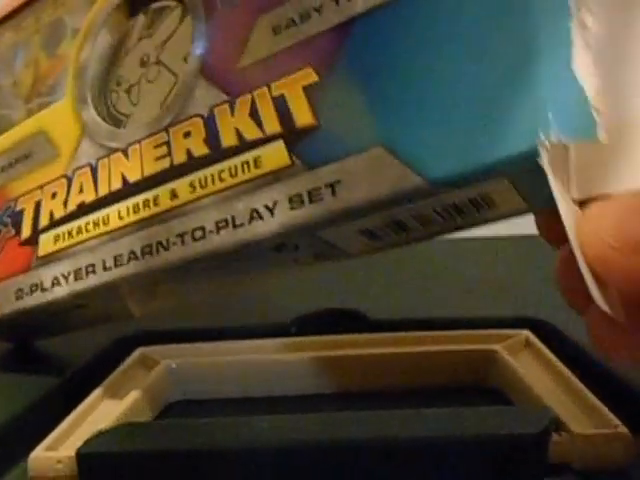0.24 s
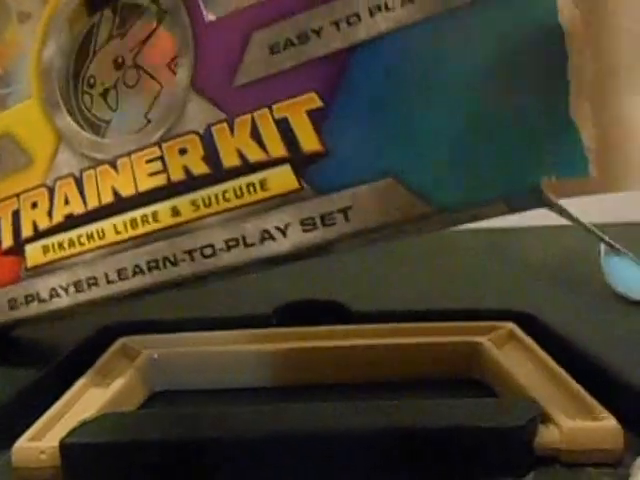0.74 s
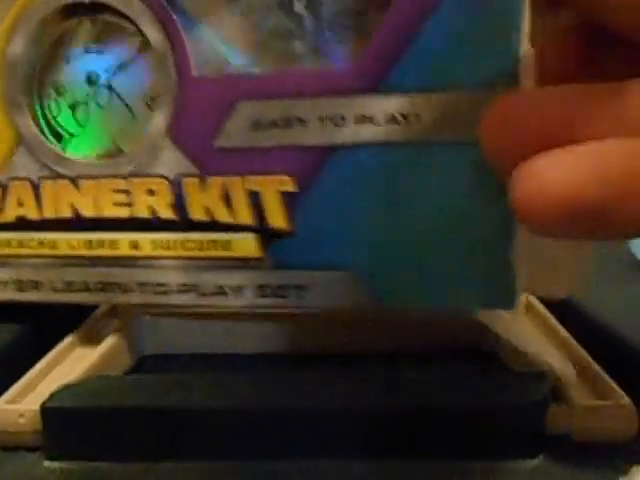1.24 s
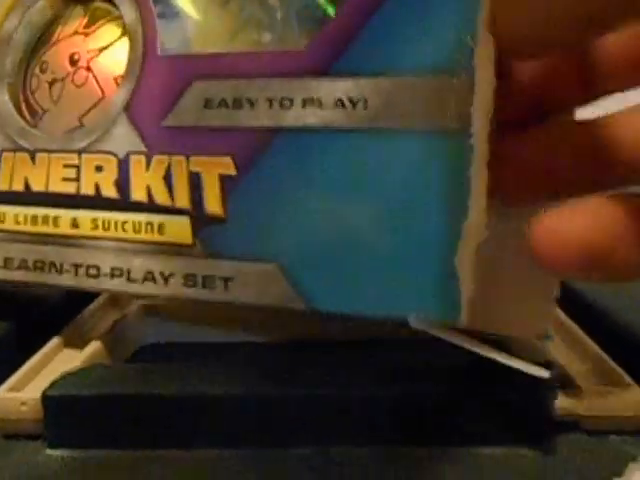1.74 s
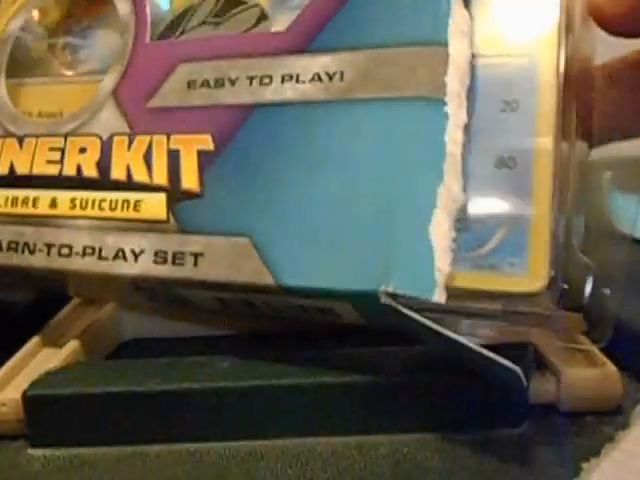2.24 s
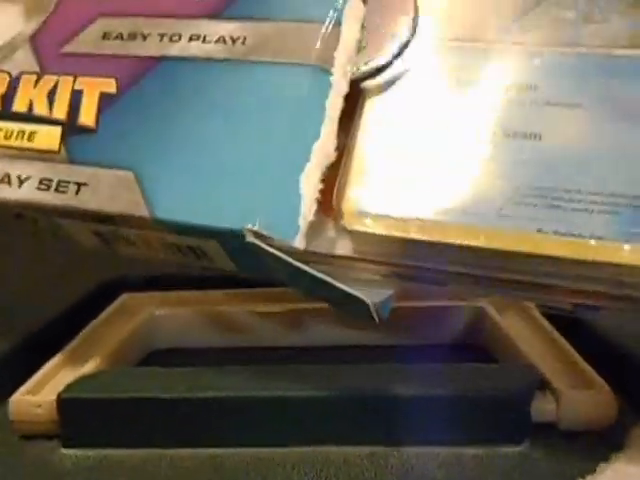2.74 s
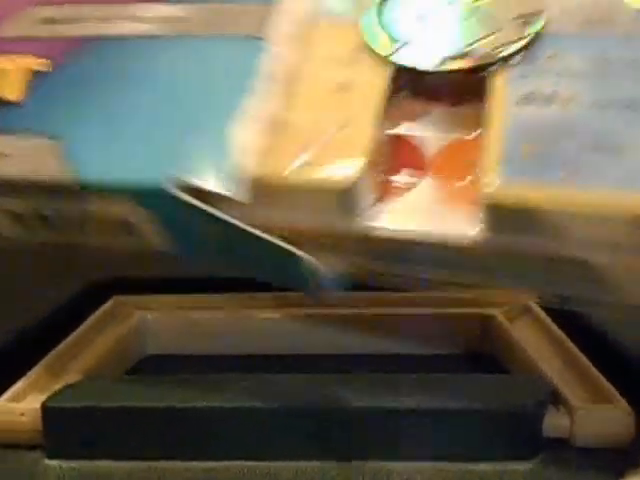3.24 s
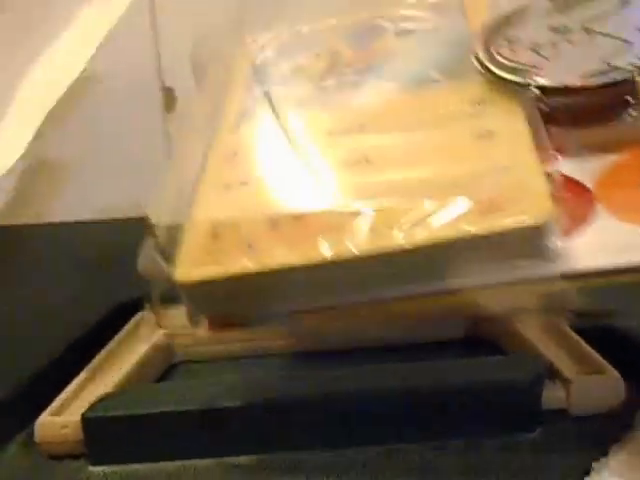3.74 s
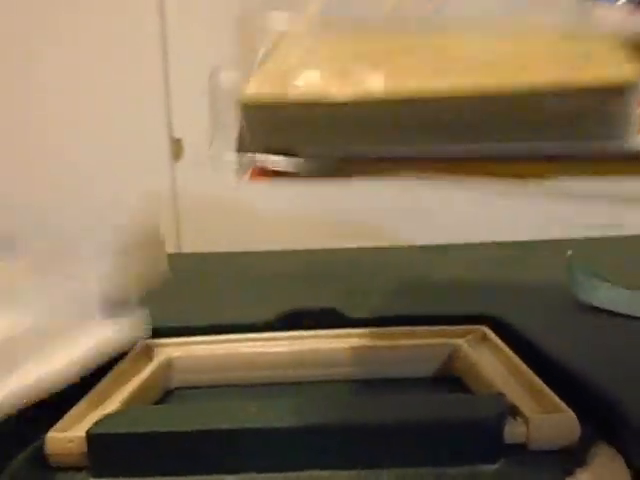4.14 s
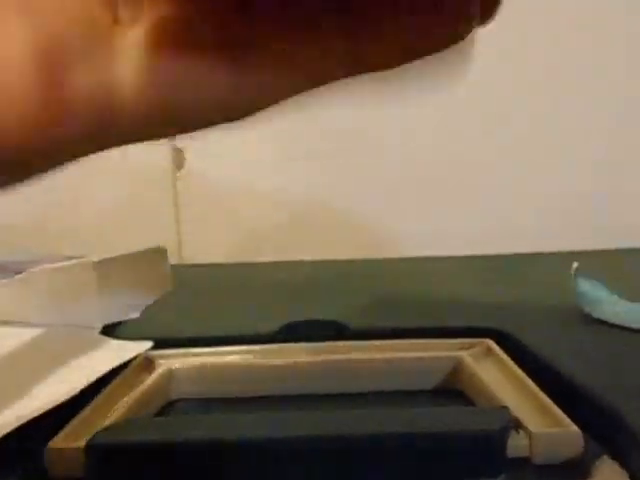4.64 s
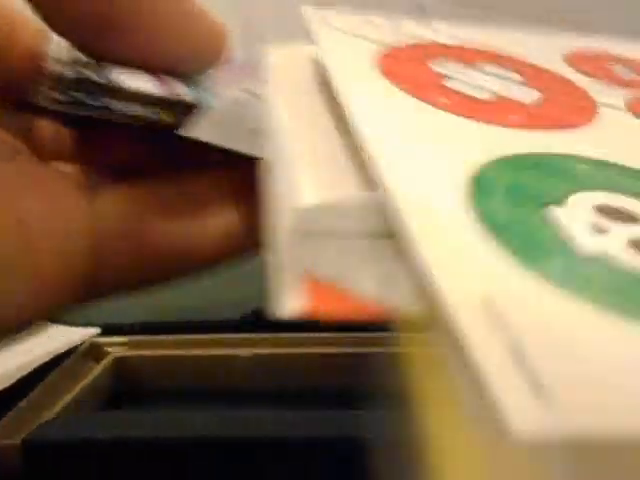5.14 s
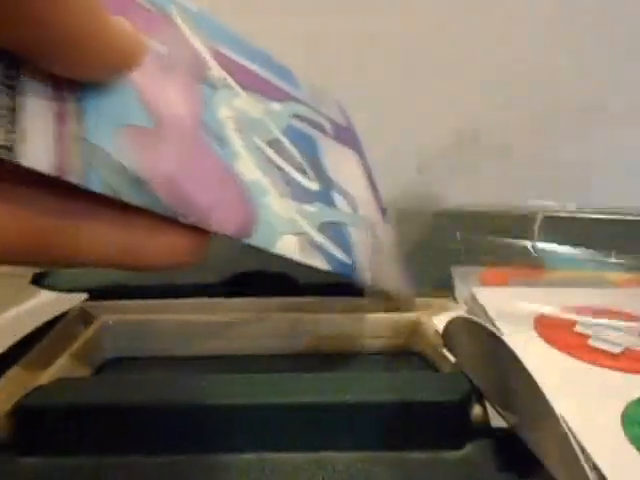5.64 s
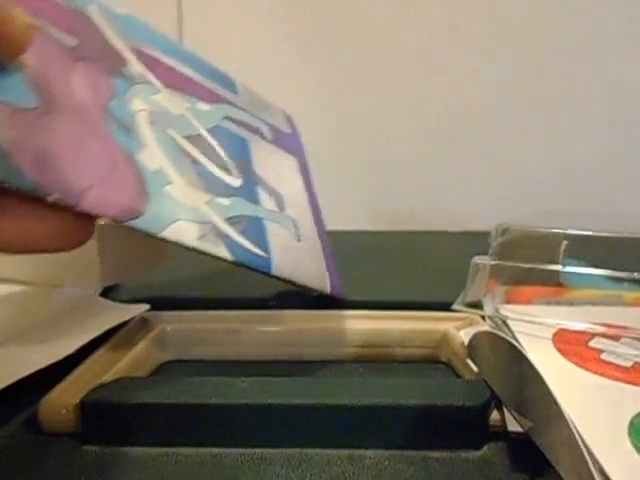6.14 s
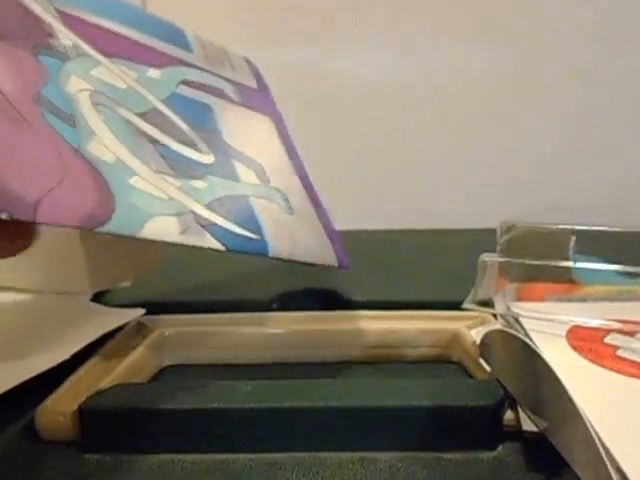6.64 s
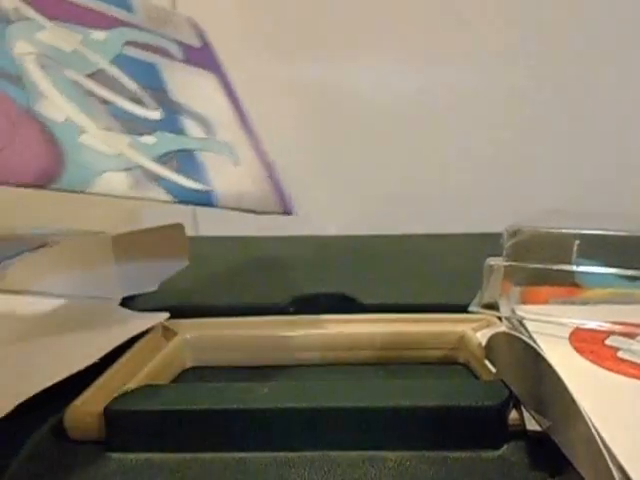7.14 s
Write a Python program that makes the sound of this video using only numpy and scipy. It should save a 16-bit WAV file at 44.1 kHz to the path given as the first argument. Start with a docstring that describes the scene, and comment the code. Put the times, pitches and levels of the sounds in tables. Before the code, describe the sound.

A close, dry, mono sound in a quiet room, with faint low rumble through the table. From 0 to 1 s, small crisp snaps pop over faint card rubbing. From 1.2 to 2 s, hollow cardboard creases crackle closely together, with a hard crack near 1.8. Between 2 and 2.75 s, a brighter, rasping slide swells twice amid soft bumps. It eases, then scraping returns at 3.3 and 3.7 with sharp film snaps. A loud crack and knock hits at 4.2, followed by a brief lull. Another snap comes at 4.75; from 5.2 to 5.6 heavy low thumps and very loud, slightly overloaded cracks tumble together. Rustling and pops fade by 6 s. Near silence follows, with faint dry ticks from 6.7, until an abrupt sharp click and solid knock at 7.3.

```python
"""Card slides on card amid small snaps from the start, with the hardest cracks late, as hands pull a
plastic tray out of a torn paperboard box on a table, close to a small microphone.
Rubbing is dense random clicks through the resonances of the box walls; creases and film snap as short
bursts of noise that ring the wall beside them; things set down thump as sums of decaying table modes.
Low noise from the rocking table and a quiet room lie beneath, and the loudest blows overload the recorder."""
import sys
import numpy as np
from scipy import signal
from scipy.fft import rfft, irfft, next_fast_len
from scipy.io import wavfile
from scipy.ndimage import uniform_filter1d

SR = 44100
rng = np.random.default_rng(int(sys.argv[2]) if len(sys.argv) > 2 else 0)


def output_pcm(signal):
    """Save a mono or channel-first signal as 16-bit PCM at the path in sys.argv[1].

    Samples are clipped to [-1, 1] before scaling.
    """
    pcm = np.clip(np.atleast_2d(signal).T, -1, 1) * 32767
    wavfile.write(sys.argv[1], SR, np.round(pcm).astype(np.int16))


N = 325017
COARSE_S = np.arange(0, N / SR + .01, .002)  # time grid of the slow level curves

# strokes of card on card: (peak time [s], rise [s], fall [s], fine hiss level [dB], box wall level [dB],
# loudest wall frequency [Hz], ring of the gap between tray and box [Hz])
STROKES = [(.11, 0.22, 0.15, -47.5, -47, 614, 2064), (0.426, 0.028, 0.067, -45, -47.5, 637, 5000),
           (0.534, 0.032, .05, -41, -49.5, 730, 4950), (.7, 0.09, 0.25, -49, -46.5, 680, 5240),
           (1.079, 0.075, 0.23, -49, -48.5, 652, 4870), (1.242, .04, 0.09, -38.5, -37, 642, 4945),
           (1.328, .025, 0.055, -43.5, -34, 650, 2710), (1.4, 0.12, 0.079, -51.5, -45.5, 650, 4900),
           (1.535, .04, .06, -38, -34, 639, 2630), (1.658, 0.12, 0.13, -46, -36, 1027, 2970),
           (1.79, .03, .12, -44.5, -32, 700, 2840), (2.0, 0.061, 0.058, -46.5, -45, 617, 3100),
           (2.162, 0.17, 0.091, -29, -33, 652, 3084), (2.25, 0.089, 0.11, -41.5, -34.5, 1770, 2865),
           (2.308, .02, 0.022, -36.5, -31, 566, 3935), (2.419, .015, 0.032, -40.5, -31, 650, 2930),
           (2.594, .15, 0.15, -27, -34.5, 1907, 3830), (2.718, .1, 0.028, -36, -36, 861, 5790),
           (2.903, .045, 0.018, -48, -40, 1550, 3790), (3.101, 0.39, .1, -60, -48.5, 950, 4375),
           (3.332, 0.23, 0.16, -32.5, -33.5, 990, 4750), (3.621, 0.14, .1, -36.5, -40, 987, 4910),
           (3.73, 0.15, .075, -36.5, -32.5, 972, 4820), (4.026, 0.019, 0.08, -40, -34.5, 854, 3000),
           (4.169, .2, 0.15, -39, -39, 1009, 2630), (4.569, 0.095, .1, -70, -53, 1075, 3598),
           (4.743, 0.16, .1, -49, -43.5, 652, 4714), (4.91, 0.24, .13, -40.5, -42.5, 621, 3790),
           (5.088, .13, 0.17, -39.5, -38.5, 1080, 5450), (5.32, .3, .2, -42.5, -45.5, 415, 5880),
           (5.5, .2, .25, -43.5, -46, 418, 4810), (5.7, 0.072, .15, -46, -36, 672, 3986),
           (5.831, 0.12, .07, -40, -30.5, 690, 5770), (5.94, 0.26, .12, -61, -37, 597, 3920),
           (6.775, .08, 0.083, -53, -75, 511, 2896), (6.914, 0.042, 0.055, -58, -76, 1200, 3430),
           (7.02, 0.04, 0.22, -58.5, -74, 600, 4680), (7.35, 0.01, 0.24, -47.5, -33, 560, 4720)]
# creases and film letting go: (time [s], crack level [dB], wall level [dB], wall frequency [Hz],
# crack frequency [Hz], time to fall 9 dB [ms], where anything below 0.3 counts as 0.3)
SNAPS = [(0.0166, -25.5, -48.5, 580, 7670, -2.3), (.036, -21, -33.5, 1060, 2990, 2.4),
         (0.218, -15.5, -25, 1940, 2890, -1.5), (0.2278, -15, -28.5, 1940, 2080, 1),
         (0.501, -30, -28, 1510, 2000, -8), (.5959, -19, -32, 970, 5330, 2.7),
         (0.636, -18, -22.5, 1480, 2840, -0.8), (0.676, -29, -33, 680, 5500, 3.5),
         (.6965, -29.5, -25.5, 860, 3640, 2), (0.7522, -22, -19, 530, 2000, 5),
         (1.0453, -49, -24.5, 660, 2440, 1.6), (1.1194, -42.5, -29.5, 550, 2210, 8.5),
         (1.1802, -40.5, -37, 580, 3030, 4), (1.258, -24, -20, 650, 8470, 2),
         (1.281, -26, -29, 870, 4020, 4.5), (1.317, -33, -14, 570, 3830, 5.3),
         (1.3242, -24.5, -19.5, 660, 3150, 11.5), (1.3658, -24.5, -21.5, 670, 5000, 2.5),
         (1.4568, -31.5, -48, 1990, 2840, 2), (1.5155, -26, -22.5, 710, 2580, 6),
         (1.537, -41, -21, 780, 2600, 3.5), (1.5994, -32, -23.5, 680, 2420, 4),
         (1.639, -31.5, -31.5, 643, 4070, 9), (1.6715, -30.5, -32.5, 1150, 3010, 9),
         (1.7048, -24.5, -32, 1030, 5370, -4.5), (1.7352, -28.5, -26, 1490, 3010, 4.5),
         (1.7918, -27.5, -27, 620, 3340, 1), (1.8005, -14, -29, 1930, 4310, 0.7),
         (1.818, -35, -30, 1310, 2950, 10), (1.8292, -12.5, -7.5, 1800, 2980, 5),
         (1.9289, -46.5, -28.5, 1500, 4230, 3), (2.0483, -29, -21.5, 590, 2400, 10),
         (2.08, -25, -26.5, 1030, 3990, 19.5), (2.115, -25.5, -25, 670, 3040, 11),
         (2.1947, -23, -57, 610, 3030, 7.5), (2.2304, -28, -31.5, 1130, 2010, 16),
         (2.306, -18.5, -21, 570, 2100, 3), (2.375, -35.5, -36.5, 700, 2870, 11),
         (2.4182, -22, -22.5, 1590, 3030, 18.5), (2.431, -20, -20.5, 650, 2000, -3.5),
         (2.4653, -31, -28.5, 640, 2760, 2.5), (2.4907, -27, -19.5, 750, 2580, 3.5),
         (2.498, -25.5, -17.5, 1030, 3930, 6.8), (2.704, -28, -26.5, 1020, 6000, 0.5),
         (2.7438, -40, -25, 970, 2000, 4.5), (2.848, -48, -38.5, 1500, 5900, 0.5),
         (2.909, -27.5, -31.5, 1490, 4630, 1), (2.916, -33.5, -32.5, 1780, 3810, 6.5),
         (3.0424, -29, -29, 970, 2490, 2.3), (3.1697, -38.5, -26.5, 1930, 2000, 2.7),
         (3.255, -34, -31, 1010, 2060, 12), (3.3382, -27, -25, 940, 2280, 13),
         (3.668, -39, -20, 1690, 1980, 16), (3.687, -16.5, -18, 1010, 2180, 9),
         (3.7226, -14, -36.5, 1870, 5100, 6), (3.738, -17, -39, 1850, 6980, 1),
         (3.7529, -10, -12.5, 1720, 4830, 1.5), (3.98, -36.5, -32.5, 920, 2720, 4.5),
         (4.016, -30, -20.5, 1530, 3050, 14), (4.0327, -12, -16.5, 830, 3740, -2.9),
         (4.076, -29.5, -26.5, 980, 2210, 11.5), (4.132, -32, -32, 950, 2620, 3.6),
         (4.175, -25, -31.5, 1150, 4250, 7), (4.1922, -25.5, -27.5, 2000, 2010, 3.5),
         (4.2263, -11.5, -3.5, 1030, 4970, 3), (4.232, -22, -12, 1030, 3880, 8.5),
         (4.2416, -21.5, -18.5, 1000, 3360, 5.5), (4.28, -19.5, -29, 860, 5300, -8.5),
         (4.2994, -20, -25, 840, 6210, -6.5), (4.3363, -37, -30.5, 980, 2000, 5),
         (4.5518, -37, -44.5, 900, 3590, 3.5), (4.6094, -43.5, -34.5, 1020, 2090, 1),
         (4.6785, -29.5, -50.5, 820, 6990, 0.6), (4.752, -21.5, -25, 583, 3800, 31),
         (4.7589, -8.5, -17.5, 970, 3870, 2.5), (4.8222, -17, -21.5, 470, 4070, 2.5),
         (4.884, -30.5, -43, 1060, 6690, 5), (4.9168, -20.5, -20.5, 1810, 4810, 5),
         (4.939, -27.5, -26, 730, 6070, 15.5), (4.991, -32.5, -38.5, 690, 8060, -2),
         (5.0432, -26, -32.5, 1080, 2720, 2.2), (5.084, -30, -29, 390, 5310, 11.5),
         (5.1784, -3, -5, 1170, 6260, 2.5), (5.1924, -6, -16, 390, 2710, -12.5),
         (5.2117, -9, -8, 610, 6290, 0.5), (5.226, -10.5, -17, 470, 3290, 0.2),
         (5.278, -19, -16.5, 390, 8480, 2.5), (5.3174, -25, -25, 610, 7500, 1.5),
         (5.373, -37, -33, 400, 8820, 10), (5.4092, -31, -24, 1090, 2870, 4),
         (5.4199, -28.5, -16, 390, 5180, 3), (5.4458, -34, -36, 650, 2690, 3.1),
         (5.4774, -18, -40.5, 390, 9160, -1.8), (5.4932, -25, -26, 1130, 3240, 0),
         (5.5337, -26, -26.5, 1120, 2470, 3), (5.5924, -7, 0, 520, 3070, 5),
         (5.634, -28, -30.5, 670, 3750, 6.5), (5.691, -29, -35, 620, 4870, -16),
         (5.7228, -20.5, -35, 1110, 4210, 3), (5.776, -14, -17.5, 1160, 2150, 2.66),
         (5.838, -26.5, -29, 1140, 2850, 6), (5.8519, -22.5, -23.5, 720, 5820, -1.5),
         (5.8635, -27, -24.5, 940, 2700, 7), (5.938, -40, -35, 400, 3870, 8.5),
         (6.1863, -35.5, -54, 730, 3490, 1.3), (6.194, -40, -50, 550, 5600, 4),
         (6.7253, -39, -56, 1660, 3090, 1.5), (6.7321, -31.5, -56, 1960, 2960, -1.5),
         (6.749, -45, -57, 1900, 3090, -1), (6.7611, -30.5, -55, 1110, 7800, -0.3),
         (6.7724, -30.5, -67, 760, 7380, -1.5), (6.8147, -34.5, -66, 450, 7470, 0.7),
         (6.873, -45, -64, 1900, 8800, 2), (6.887, -35, -67, 510, 5160, -2.5),
         (6.8993, -35, -48, 970, 6100, 5), (6.9163, -50.5, -67, 1100, 8040, 12),
         (6.9312, -27.5, -63, 1240, 8150, -0.5), (6.9956, -29, -58.5, 1910, 4500, 3.6),
         (7.044, -42, -64, 560, 7020, 7), (7.061, -39.5, -59, 390, 7460, 2.5),
         (7.1242, -43.5, -46, 1190, 5350, -0.5), (7.147, -37, -52, 1390, 2400, 0),
         (7.215, -47.5, -62, 896, 7900, 2), (7.2321, -35, -50, 1480, 8240, -1),
         (7.244, -43.5, -50, 1940, 2230, 2), (7.275, -47, -57, 1960, 2500, 1.5),
         (7.301, -41, -60, 1900, 8300, 1), (7.3146, -19, -13.5, 634, 2400, 0.5),
         (7.3169, -16.5, -10, 390, 8420, 5), (7.328, -1.5, -7, 580, 2660, -0.5)]
# modes of the table top: (frequency [Hz], level [dB], time to decay 60 dB [s])
TABLE_MODES = [(45, -8.5, 0.11), (63, -5, 0.16), (94.4, -1, 0.089), (162.4, -2.5, .09), (196, 2.5, 0.087),
               (252.2, 2, 0.092), (328, 1, .06)]


def slide():
    """Stick-slip friction: card rubs on card, and related slips excite the resonances of the box walls."""
    # wall resonances of the box: (frequency [Hz], bandwidth [Hz], level [dB])
    box_modes = [(260, 230, -16.5), (364, 160, -2.5), (556, 422, 1.5), (694, 309, 4.5), (825, 60, -0.5),
                 (1076, 180, -0.5), (1300, 750, -6.5), (1780, 330, -0.5), (2310, 840, -13.5)]
    # spectrum of the fine rubbing hiss: (frequency [Hz], spectral level [dB])
    hiss_spectrum = [(880, -26), (1500, -5.5), (2430, -5), (3220, -5), (3790, -4.5), (5390, -6),
                     (6710, -5.5), (8360, -5.5), (10500, -15), (13600, -43.5), (22000, -120)]

    peak_s, rise_s, fall_s, hiss_db, wall_db = movements()
    *_, wall_hz, gap_hz = np.transpose(STROKES)
    shape_db = swells(peak_s, rise_s, fall_s)
    # at each moment the loudest stroke sets the two moving resonances
    stroke_db = (shape_db + np.maximum(hiss_db, wall_db)[:, None])[:len(STROKES)]
    loudest = stroke_db.argmax(0)
    grip = loudest[np.searchsorted(COARSE_S, np.arange(N) / SR)]
    hiss_db = summed(shape_db + hiss_db[:, None])
    wall_db = summed(shape_db + wall_db[:, None])

    slips = fibres(per_s=9000, spread_db=1.0, clump_db=2.0, clump_s=0.0058)
    catches = fibres(per_s=1800, spread_db=3.5, clump_db=3.5, clump_s=0.02)
    catches = catches + 0.52 * slips

    gap_ring = evened(wander(slips, gap_hz[grip], 400))
    hiss = coloured(slips, hiss_spectrum) + .4 * gap_ring
    # where the walls drown the hiss the rub is heavy and soft, and loses its top
    soft = np.clip((wall_db - hiss_db) / 14, 0, .75)
    hiss = hiss - soft * band(hiss, 4500, 13000)

    # neighbouring modes have opposite signs
    walls = sum((-1) ** k * gain_of(db) * resonate(catches, hz, width)
                for k, (hz, width, db) in enumerate(box_modes))
    wall_ring = evened(wander(catches, wall_hz[grip], 180))
    walls = evened(walls) + .75 * wall_ring
    walls = walls - 0.62 * soft * band(walls, 930, 5000)
    return (gain_of(hiss_db) * flexing(hiss, patchy_db=3.0)
            + gain_of(wall_db) * flexing(walls, patchy_db=3.0))


def movements():
    """Superposition of work and relaxation: the strokes, and the settling after each snap, as like rows."""
    s, crack_db, wall_db, *_ = np.transpose(SNAPS)
    each = np.ones(len(s))
    # after each snap the card settles with a short rustle, far below the crack itself
    delay_s, rise_s, fall_s = 0.0034, .012, 0.075
    hiss_drop_db, wall_drop_db = -32, -19.5
    settling = [s + delay_s, rise_s * each, fall_s * each, crack_db + hiss_drop_db, wall_db + wall_drop_db]
    return np.hstack([np.transpose(STROKES)[:len(settling)], settling])


def fibres(per_s, spread_db, clump_db, clump_s):
    """Stick-slip as a random pulse train: fibres catch and slip in dense, uneven clicks that clump."""
    spread = spread_db * np.minimum(rng.exponential(1, N), 5)
    size = gain_of(spread + clump_db * drift(clump_s))
    strikes = rng.random(N) < per_s / SR
    return evened(size * rng.standard_normal(N) * strikes)


def flexing(x, patchy_db):
    """Time-varying filtering: card bends as it slides, so bands of colour come and go."""
    z = signal.stft(x, nperseg=256)[2]
    # random levels smoothed over 3 frequency bins and 16 frames
    patches = uniform_filter1d(rng.standard_normal(z.shape), size=3, axis=0)
    patches = uniform_filter1d(patches, size=16, axis=1)
    z = z * gain_of(patchy_db * evened(patches))
    return evened(signal.istft(z, nperseg=256)[1][:N])


def snap():
    """Impulsive release of strain: short cracks of noise, each ringing the patch of wall beside it."""
    s, crack_db, wall_db, wall_hz, crack_hz, fall_ms = np.transpose(SNAPS)[:, :, None]
    sharp, dull, echo = rng.standard_normal((3, len(s), 3072))
    t = np.arange(echo.shape[1]) / SR
    fall_s = np.maximum(fall_ms, .3) / 1000
    rise_s = .0005 + .15 * fall_s  # a fixed time plus a share of the fall
    shape = np.minimum(t / rise_s, 1) * gain_of(-9 * np.maximum(t - rise_s, 0) / fall_s)
    sharp, dull = sharp * shape, dull * shape

    # treble over middle: -9 dB for a 4 kHz crack, 15 dB more per octave above
    treble_db = -9 + 15 * np.clip(np.log2(crack_hz / 4000), -.5, 1)
    crack = band(sharp, 2300, 5900) + gain_of(treble_db) * band(sharp, 5300, 8600)
    crack += 3.4 * np.array([resonate(x, hz, 0.05 * hz) for x, hz in zip(sharp, crack_hz[:, 0])])
    wall = .26 * band(dull, 470, 1500)
    wall += np.array([resonate(x, hz, 200) for x, hz in zip(dull, wall_hz[:, 0])])

    # small echoes off table and wall fill the next few hundredths of a second
    tail = echo * (1 - np.exp(-t / 0.009)) * gain_of(-28 - 60 * t / 0.032)
    crack = crack / abs(crack).max(1)[:, None] + band(tail, 1500, 6500)
    wall = wall / abs(wall).max(1)[:, None] + 1.8 * band(tail, 300, 1600)
    sounds = gain_of(crack_db + 3.5) * crack + gain_of(wall_db + 3.0) * wall
    mix = np.zeros(N)
    for at, sound in zip(s[:, 0], sounds):
        add(mix, at, sound)
    return mix


def thumps():
    """Linear superposition: each landing excites the table top anew, with small chance in its modes."""
    # things landing on the table: (time [s], level [dB], frequency that the spot favours [Hz])
    landings = [(1.02, -28, 182), (1.25, -44, 51.1), (1.821, -36.5, 398), (2.05, -31.5, 376),
                (2.347, -27.5, 205), (2.412, -23.5, 250), (2.459, -26, 170), (2.491, -26, 212),
                (3.339, -28, 103), (4.032, -23, 255), (4.059, -28.5, 255), (4.227, -9.5, 272),
                (4.268, -21, 148), (4.293, -23.5, 91.5), (4.764, -24, 153), (4.913, -27, 300),
                (5.073, -27, 306), (5.177, -2.5, 80.7), (5.198, -10.5, 69.4), (5.279, -8.5, 73.5),
                (5.314, -9.5, 76.5), (5.41, -7, 90), (5.482, -17.5, 151), (5.513, -16.5, 80),
                (5.59, -10, 342), (5.628, -11.5, 51.1), (5.699, -26.5, 56.5), (5.775, -21.5, 141),
                (5.799, -25, 184), (7.3141, -7.5, 194), (7.323, -10.5, 70)]
    mix = np.zeros(N)
    for s, db, spot_hz in landings:
        add(mix, s, thump(db, spot_hz, rng.standard_normal(len(TABLE_MODES))))
    return mix


def thump(db, spot_hz, chance):
    """Modal synthesis: a soft push rings the table top; each spot favours the modes near one pitch."""
    t = np.arange(round(.3 * SR)) / SR
    ring = np.zeros(len(t))
    for (hz, level_db, t60), c in zip(TABLE_MODES, chance):
        off_pitch_db = 8.2 * abs(np.log2(hz / spot_hz))  # 8.2 dB per octave of distance
        mode_db = level_db + 0.83 * c - off_pitch_db - 60 * t / t60
        ring += gain_of(mode_db) * np.sin(2 * np.pi * hz * t)
    ring *= (1 - np.exp(-t / 0.0014)) ** 2  # soft onset
    return gain_of(db - 1.24) * ring / np.abs(ring).max()


def shake():
    """Structure-borne sound: lumpy low noise that reaches the microphone through the table."""
    # hands and box rock the table: (peak time [s], rise [s], fall [s], deep sway level [dB],
    # level of the drag on the table top [dB])
    rocks = [(0, .1, 0.4, -50.5, -60), (.27, 0.073, 0.12, -37, -44), (.8, 0.53, 0.15, -42, -50),
             (1.397, 0.28, 0.11, -31, -54), (1.8, 0.67, 0.19, -40, -47), (2.085, 0.15, 0.14, -41, -50),
             (2.25, .2, 0.19, -39, -49.5), (2.38, 0.041, 0.25, -32.5, -46), (3.3, 1, .15, -56, -57.5),
             (3.72, 0.14, .1, -48.5, -41), (4.05, 0.096, 0.17, -39, -43), (4.3, .12, 0.21, -38.5, -41.5),
             (4.72, 0.097, 0.13, -44, -41), (4.94, 0.12, 0.18, -44.5, -49), (5.21, 0.018, 1, -27.5, -33.5),
             (5.64, .06, 0.1, -23, -36), (5.77, 0.038, 0.34, -35, -56), (5.92, .2, .15, -51, -34.5),
             (7.341, 0.0083, 0.34, -18.5, -26)]
    # spectrum of the low noise: (frequency [Hz], spectral level [dB])
    rumble_spectrum = [(12, -32), (22, -3), (45, -6), (70, -10.5), (120, -8), (200, -5), (330, -18),
                       (600, -100)]
    split_hz, still_db = 84, -71  # sway below the split, drag above; the table never rests completely

    peak_s, rise_s, fall_s, sway_db, drag_db = np.transpose(rocks)
    shape_db = swells(peak_s, rise_s, fall_s)
    lumps = rng.standard_normal(N) * gain_of(2.5 * drift(.015))
    lumps = coloured(lumps, rumble_spectrum)
    drag = evened(band(lumps, split_hz, 500))
    sway = evened(signal.sosfilt(signal.butter(2, split_hz, fs=SR, output="sos"), lumps))
    sway_gain = gain_of(summed(sway_db[:, None] + shape_db)) + gain_of(still_db)
    drag_gain = gain_of(summed(drag_db[:, None] + shape_db))
    return sway_gain * sway + drag_gain * drag


def quiet_room():
    """Stationary noise: a steady random background with a fixed spectrum."""
    # spectrum of the room: (frequency [Hz], spectral level [dB])
    room_spectrum = [(15, -21), (25, -1.5), (58, 0.5), (126, -3), (184, -6), (589, -9), (739, -9),
                     (818, -10.5), (10500, -21.5), (13600, -55), (22000, -120)]
    return gain_of(-59.5) * coloured(rng.standard_normal(N), room_spectrum)


def swells(peak_s, rise_s, fall_s):
    """Envelope of a movement in dB: a rounded rise to its peak and a rounded fall."""
    late = COARSE_S - peak_s[:, None]
    away = np.where(late < 0, -late / rise_s[:, None], late / fall_s[:, None])
    return -22.5 * away ** 1.325  # 22.5 dB down one rise before and one fall after the peak


def summed(db):
    """Incoherent addition: the powers of overlapping movements add; dB for every sample."""
    power = (gain_of(db) ** 2).sum(0)
    return np.interp(np.arange(N) / SR, COARSE_S, 10 * np.log10(power + 1e-9))


def resonate(x, hz, width):
    """Damped resonator: one complex pole with a peak gain of 1."""
    r = np.exp(-np.pi * width / SR)
    return 2 * signal.lfilter([1 - r], [1, -r * np.exp(2j * np.pi * hz / SR)], x).real


def wander(x, hz, width):
    """Heterodyne resonator that follows a pitch curve: shift down, smooth, shift back."""
    turn = np.exp(2j * np.pi * np.cumsum(hz) / SR)
    r = np.exp(-np.pi * width / SR)
    return 2 * (turn * signal.lfilter([1 - r], [1, -r], x / turn)).real


def coloured(x, points):
    """Spectral shaping: multiplies the spectrum by a table of levels over log frequency; rms 1."""
    size = next_fast_len(len(x))
    table_hz, table_db = np.transpose(points)
    hz = np.fft.rfftfreq(size, 1 / SR)
    db = np.interp(np.log(hz + 1), np.log(table_hz + 1), table_db)
    return evened(irfft(rfft(x, size) * gain_of(db), size)[:len(x)])


def band(x, low_hz, high_hz):
    """Band-pass filtering: keeps the frequencies between two edges."""
    edges = [low_hz, min(high_hz, SR / 2 - 1)]
    return signal.sosfilt(signal.butter(2, edges, "bandpass", fs=SR, output="sos"), x)


def drift(seconds):
    """Low-passed chance: noise averaged twice over a time, rms 1."""
    size = max(round(seconds * SR), 2)
    return evened(uniform_filter1d(uniform_filter1d(rng.standard_normal(N), size), size))


def gain_of(db):
    """Logarithmic level: decibels to amplitude gain."""
    return 10 ** (np.asarray(db) / 20)


def evened(x):
    """Normalisation of energy: scales to rms 1."""
    return x / np.sqrt(np.mean(x ** 2) + 1e-20)


def add(mix, s, sound):
    """Superposition: mixes a sound in at a time in seconds."""
    part = mix[max(round(s * SR), 0):][:len(sound)]
    part += sound[:len(part)]


def scene():
    """Superposition of sliding, snaps, thumps and table noise over the quiet room."""
    return (slide() + snap() + thumps() + shake() + quiet_room())[None]


def record(dry):
    """Overload and band limiting: the input stage clips and rolls off the top treble; then the band limit."""
    clipped = np.clip(dry, -.64, .64)
    treble_roll_off = signal.firwin(121, 10770, window=("kaiser", 5), fs=SR)
    band_limit = signal.firwin(511, 11600, window=("kaiser", 9), fs=SR)
    dull = signal.oaconvolve(clipped, treble_roll_off[None], "same")
    return signal.oaconvolve(dull, band_limit[None], "same")


dry = scene()
out = record(dry)
output_pcm(out)
```